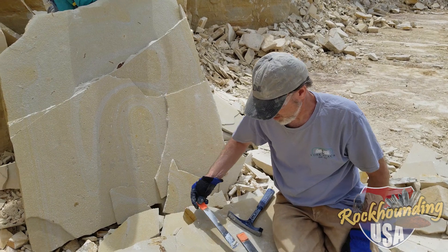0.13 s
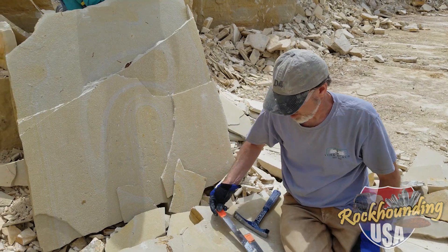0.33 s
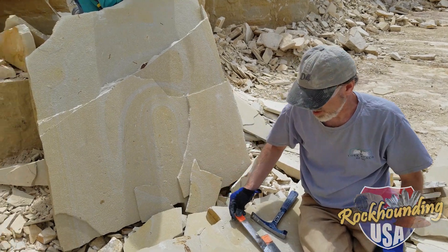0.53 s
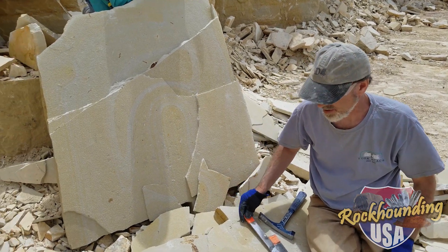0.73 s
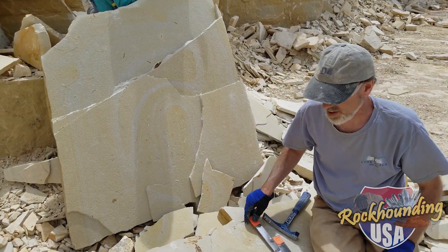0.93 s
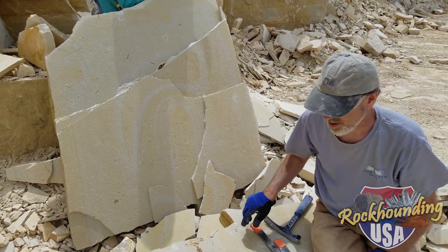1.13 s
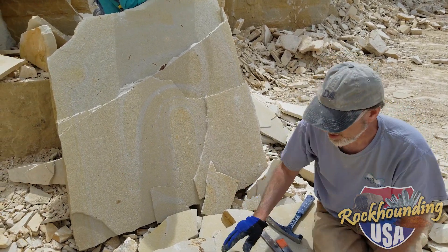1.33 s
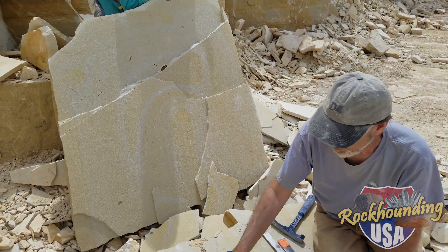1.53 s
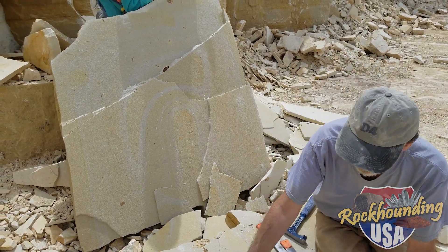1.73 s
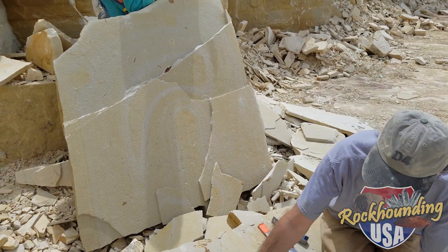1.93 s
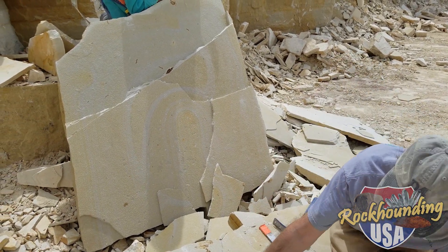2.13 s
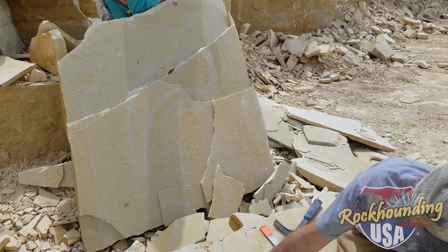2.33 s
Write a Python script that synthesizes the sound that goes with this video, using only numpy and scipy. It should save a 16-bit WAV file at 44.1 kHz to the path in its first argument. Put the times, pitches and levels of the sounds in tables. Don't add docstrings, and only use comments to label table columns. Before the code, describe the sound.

A steel blade chatters onto stone in bright clinks and drags; chips tick and a glove creaks. A second, quickly muted clatter follows, then cloth rustle and stone scuffs, in an open quarry with wind thumping close stereo microphones.

```python
import sys
import numpy as np
from scipy import signal
from scipy.fft import rfft, irfft, next_fast_len
from scipy.io import wavfile
from scipy.ndimage import uniform_filter1d, map_coordinates

SR = 44100
rng = np.random.default_rng(int(sys.argv[2]) if len(sys.argv) > 2 else 0)


def unload_audio(sound):
    columns = np.transpose(np.atleast_2d(sound))
    steps = np.round(np.clip(columns, -1, 1) * 32767)
    wavfile.write(sys.argv[1], SR, steps.astype(np.int16))


def rack_gain(trim_db):
    fader = np.asarray(trim_db, float)
    return 10 ** (fader / 20)


N = 105178

# (frequency [Hz], level [dB])
BLADE_MODES = [(3425, -0.5), (4060, 3), (5085, 8.5), (5350, 3), (5950, 3.5), (6230, 3), (7000, 4.5),
               (7170, 5.5), (8560, 7), (8870, 7), (10990, 9), (11720, -6), (12570, -11), (13700, -14.5)]
# (frequency [Hz], level [dB])
HAMMER_MODES = [(2110, 1.5), (2160, 0), (2425, -2), (2527, 4), (5060, 5), (5920, -0.5), (6265, -0.5)]


def unit(x):
    return x / np.sqrt(np.mean(x ** 2) + 1e-20)


def along(points, hz):
    f, v = np.transpose(points)
    return np.interp(np.log(hz + 1), np.log(f + 1), v, right=v[-1])


def wobble(rate):
    return map_coordinates(rng.standard_normal(1000), [np.arange(N) * min(rate, 400) / SR])


def filtered(x, response):
    m = next_fast_len(N + SR // 2)
    return irfft(rfft(x, m) * response(np.fft.rfftfreq(m, 1 / SR)), m)[..., :N]


def noise(spectrum):
    return unit(filtered(rng.standard_normal(N), lambda hz: rack_gain(along(spectrum, hz))))


def band(hz, octaves=0.59, count=1):
    def skirts(f):
        away = np.maximum(abs(np.log2((f + 1) / hz)) - octaves / 2, 0)
        return rack_gain(-24 * away / max(octaves, 0.1))
    return unit(filtered(rng.standard_normal((count, N)), skirts)).squeeze()


def peaks(table):
    def response(f):
        total = 0
        for k, (centre, width, db) in enumerate(table):
            total = total + (-1) ** k * rack_gain(db) * 1j * f * width / (centre ** 2 - f ** 2 + 1j * f * width)
        return total
    return response


def placed(x, lag_s, pan_db):
    side = np.array([[1], [-1]])
    return filtered(x, lambda hz: rack_gain(side * pan_db / 2) * np.exp(-1j * np.pi * hz * lag_s * side))


def ring(modes, t, tilt_db, chance, t60_s, damping):
    hz, db = np.transpose(modes)[..., None]
    t60 = t60_s * (hz / 5000) ** -damping
    strength_db = db + tilt_db * np.log2(hz / 5000) + 2.7 * chance[:len(modes), :1]
    sign = np.sign(chance[:len(modes), 1:])
    partials = rack_gain(strength_db - 60 * t / t60) * np.sin(2 * np.pi * hz * t) * sign
    return np.sum(partials, 0) * (1 - np.exp(-t / 0.0006))


def blade_contacts(grit):
    # (time [s], level [dB], tilt [dB per octave], hammer ring level [dB])
    contacts = [(.401, -30.5, -21, -59), (0.4069, -26, -11, -61), (.4115, -18, 0.5, -52),
                (0.4185, -23.5, -3, -57), (0.4225, -33.5, 9, -41), (0.4292, -20.5, -7.5, -44),
                (0.8892, -53.5, 16, -58), (0.933, -39.5, -3, -63), (0.9658, -26.5, -7, -37.5),
                (0.9996, -24, -9, -29.5), (1.007, -21, -17, -32), (1.014, -33.5, 5, -32.5),
                (1.017, -23, -20, -23), (1.026, -26, -6.5, -42), (1.033, -34, -18, -39),
                (1.041, -34.5, -13.5, -41.5), (1.048, -34, -1.5, -46)]
    crack_db, crack_t60_s = 4.5, 0.00081
    grit_db, grit_t60_s = 0.5, 0.048
    grip_s, grip_db = 1.058, -35
    out, t = np.zeros(N + SR), np.arange(SR // 4) / SR
    chances = rng.standard_normal((len(contacts), 28, 2))
    for (s, db, tilt, hammer_db), chance in zip(contacts, chances):
        k = round(s * SR)
        here = slice(k, k + len(t))
        burst = grit[here] * (rack_gain(crack_db - 60 * t / crack_t60_s) + rack_gain(grit_db - 60 * t / grit_t60_s))
        steel = ring(BLADE_MODES, t, tilt, chance, t60_s=0.03, damping=0.51)
        hammer = ring(HAMMER_MODES, t, 0, chance[14:], t60_s=0.093, damping=0.35)
        out[here] += rack_gain(db - 5.5) * (steel + burst) + rack_gain(hammer_db - 3.0) * hammer
    closing = np.clip((np.arange(N) / SR - grip_s) / 0.004, 0, 1)
    return out[:N] * rack_gain(0.99 * wobble(250) + grip_db * closing)


def blade_drag(grit):
    # (time [s], level [dB])
    pressure = [
        (0.439, -48.5),
        (.54, -59),
        (.76, -64),
        (.82, -57.5),
        (.96, -46),
        (1.068, -49),
        (1.2, -76),
    ]
    s, db = np.transpose(pressure)
    grains = rng.standard_normal(N) * rack_gain(4.8 * wobble(280))
    body = peaks([(hz, 300, level) for hz, level in BLADE_MODES + HAMMER_MODES[:1]])
    scrape = unit(filtered(grains, body)) + 0.77 * grit
    return rack_gain(np.interp(np.arange(N) / SR, s, db, left=-120, right=-120)) * scrape


def blade():
    grit = noise([(1300, -57.5), (2200, -4.5), (8500, -1.0), (13500, -0.5), (15000, -10)])
    return blade_contacts(grit) + blade_drag(grit)


def creak():
    # (time [s], level [dB])
    slip_times = [(0.5503, -48), (0.5545, -34), (.5605, -37), (0.5655, -48.5), (.572, -35), (0.5756, -36),
                  (0.5819, -33), (0.5866, -33), (0.5924, -29.5), (0.5955, -36), (0.6026, -32),
                  (.6079, -30.5), (.612, -34)]
    # (frequency [Hz], width [Hz], level [dB])
    glove = [(3720, 216, 12), (5720, 800, 4), (8130, 920, 5.5), (13000, 1800, -4)]
    grows_db = 13
    s, db = np.transpose(slip_times)
    slips = np.zeros(N)
    for k, scrape in enumerate(rng.standard_normal((4, len(s)))):
        slips[(s * SR).astype(int) + 5 * k] = rack_gain(db + 19.5) * (0.26 * scrape + (k == 0))
    t = np.clip(np.arange(N) / SR, s[0], s[-1])
    opening = rack_gain(grows_db * (t - s[-1]) / (s[-1] - s[0]))
    return filtered(slips * opening, peaks(glove[:1])) - filtered(slips, peaks(glove[1:]))


def chips():
    # (time [s], level [dB], pitch [Hz], bright share [dB])
    ticks = [
        (0.4898, -28, 5800, -6.5),
        (.5035, -36, 7960, 0),
        (.510, -30.5, 5760, -12),
        (0.6497, -42, 3800, 4),
        (0.666, -30, 3200, -13),
        (0.687, -34, 2940, -14),
        (0.705, -35, 3160, -13),
        (0.718, -39.5, 3120, 1.5),
    ]
    out, t = np.zeros(N + SR), np.arange(1000) / SR
    for (s, db, hz, bright_db), hiss in zip(ticks, rng.standard_normal((len(ticks), 1000))):
        pitch = rack_gain(-60 * t / 0.0076) * (1 - np.exp(-t / 0.00039)) * np.sin(2 * np.pi * hz * t)
        snap = rack_gain(bright_db - 60 * t / 0.0076) * hiss
        out[round(s * SR):][:len(t)] += rack_gain(db) * (pitch + snap)
    return out[:N]


def scuffs():
    # (time [s], level [dB], t60 [s], centre [Hz])
    scrapes = [
        (.402, -35.5, 0.085, 1840),
        (0.4112, -38.5, 0.19, 2080),
        (0.479, -41.5, 0.062, 730),
        (.999, -28, 0.087, 373),
        (2.3205, -37.5, 0.046, 7050),
        (2.3225, -50, 0.31, 4530),
        (2.32, -36.5, 0.095, 724),
        (2.353, -32.5, 0.034, 730),
        (2.376, -41, 0.088, 790),
    ]
    t, out = np.arange(N) / SR, np.zeros(N)
    for s, db, t60, hz in scrapes:
        out += (t > s) * rack_gain(db - 60 * abs(t - s) / t60 + 2.2 * wobble(300)) * band(hz)
    return out


def rock(x):
    # (frequency [Hz], t60 [s])
    decay = [(1000, 0.25), (12000, 0.016)]
    hz, t, z = signal.stft(rng.standard_normal((2, SR // 3)), SR, nperseg=256)
    fading = z * rack_gain(-60 * t / along(decay, hz)[:, None])
    tail = signal.istft(fading, SR, nperseg=256)[1]
    late = np.pad(x, (200, 0))[None]
    return signal.fftconvolve(late, tail / np.linalg.norm(tail[0]), axes=1)[:, :N]


def clothing():
    # (time [s], level [dB], length [s], centre [Hz], width [octaves])
    rustles = [(0.696, -58.5, 0.052, 3050, 0.4), (1.41, -54, 0.04, 5900, 0.62),
               (1.415, -56.5, 0.045, 13000, 0.6), (1.687, -60.5, 0.032, 7100, 0.35),
               (1.74, -50.5, 0.072, 12900, 0.6), (1.794, -59, 0.046, 1154, 0.41),
               (1.797, -48, 0.052, 5200, 0.95), (1.844, -57.5, 0.073, 2300, 1.03),
               (1.885, -56, 0.044, 675, 0.95), (1.904, -49.5, 0.087, 11400, 0.49),
               (1.878, -50.5, 0.044, 5360, 0.96), (1.97, -52.5, 0.051, 5600, 1.02),
               (2.176, -56.5, 0.22, 4930, 2.9)]
    t, out = np.arange(N) / SR, np.zeros((2, N))
    for s, db, length, hz, octaves in rustles:
        shared, *apart = band(hz, octaves, count=3)
        lagged = np.array([np.roll(shared, 7), shared]) * rack_gain([[-1], [1]])
        out += rack_gain(db - 6.95 * abs((t - s) / length) ** 1.3) * (lagged + 1.32 * np.array(apart))
    return out * rack_gain(1.06 * wobble(150) + 0.28 * wobble(25.7))


def swells(rows, spectrum, tone, drift, steep_db, shape):
    t, out, rough = np.arange(N) / SR, np.zeros(N), noise(spectrum)
    clock = np.cumsum(1 + drift * wobble(45)) / SR
    for (s, db, length, hz), turn in zip(rows, rng.random(len(rows))):
        near = slice(max(int((s - 3 * length) * SR), 0), int((s + 3 * length) * SR))
        swing = np.sin(2 * np.pi * (hz * clock[near] + turn))
        since = t[near] - s
        away = abs(since / length * np.where(since < 0, 1.4, 1))
        out[near] += rack_gain(db - steep_db * away ** shape) * (tone * swing + (1 - tone) * rough[near])
    return out


def wind():
    # (time [s], level [dB], length [s], swing [Hz])
    eddies_left = [(0.308, -26.5, 0.026, 74.4), (0.343, -20.5, 0.019, 117.3), (0.366, -24, 0.02, 99.1),
                   (0.411, -22.5, 0.03, 88.4), (0.516, -12, 0.057, 109), (0.554, -9, 0.013, 113),
                   (0.597, -21, 0.052, 94), (0.678, -17.5, 0.038, 102), (0.785, -14, 0.03, 73),
                   (0.832, -15, 0.021, 62), (0.968, -21.5, 0.019, 104.3), (1.038, -20.5, 0.0091, 118.6),
                   (1.107, -23, 0.015, 104.3), (1.199, -22.5, 0.08, 86.76), (1.249, -23, 0.05, 75.63),
                   (1.287, -23.2, 0.0098, 70.9), (1.338, -18.5, 0.0097, 73.48), (1.468, -24, 0.012, 81.5),
                   (1.58, -16, 0.057, 75.6), (1.632, -16, 0.02, 116), (2.088, -17, 0.059, 73.74),
                   (2.113, -19, 0.029, 69.9), (2.2, -20.5, 0.019, 126.3), (2.292, -30, 0.023, 129)]
    eddies_right = [(0.394, -16.5, 0.0086, 80), (0.535, -11.5, 0.0085, 91), (0.805, -16.5, 0.034, 102),
                    (0.833, -30.5, 0.04, 64), (0.91, -31, 0.029, 75), (0.997, -18, 0.082, 90),
                    (1.036, -22, 0.065, 92), (1.117, -18.5, 0.086, 87), (1.171, -13.5, 0.013, 112),
                    (1.271, -31, 0.021, 89), (1.296, -33, 0.0092, 72), (1.335, -16, 0.016, 74),
                    (1.58, -12.5, 0.017, 85), (1.627, -17.5, 0.052, 80), (1.686, -22, 0.032, 88),
                    (1.81, -29, 0.024, 90), (2.078, -15, 0.063, 75), (2.146, -25, 0.022, 98),
                    (2.173, -21.5, 0.07, 117), (2.203, -23.5, 0.013, 105), (2.228, -18, 0.033, 98),
                    (2.258, -13, 0.016, 106), (2.307, -12, 0.054, 81), (2.36, -13.6, 0.04, 104)]
    # (time [s], level [dB], length [s])
    sing_left = [(0.522, -20.5, 0.046), (0.55, -40.5, 0.013), (0.595, -30, 0.063), (0.678, -27, 0.042),
                 (1.002, -23, 0.016), (1.573, -32.5, 0.043), (2.096, -37.5, 0.12), (2.205, -26.5, 0.024),
                 (2.231, -27.4, 0.022), (2.292, -19.5, 0.032), (2.331, -20.5, 0.039), (2.357, -13.5, 0.017),
                 (2.382, -13, 0.014)]
    sing_right = [(0.506, -22, 0.068), (0.523, -37, 0.028), (0.56, -24.5, 0.073), (0.597, -16.5, 0.016),
                  (0.656, -25, 0.051), (0.804, -25, 0.016), (1.006, -29, 0.045), (1.271, -34.5, 0.033),
                  (1.578, -37.5, 0.044), (2.085, -35.5, 0.083), (2.234, -21, 0.011), (2.256, -26.5, 0.052),
                  (2.359, -22, 0.019)]
    # (frequency [Hz], level [dB])
    swirl = [(20, -8), (70, 0), (130, -10), (400, -33.5), (1500, -106)]
    # (time [s], level [dB])
    gust = [
        (0.271, -59),
        (.31, -37.5),
        (.66, -27),
        (.74, -37.5),
        (1.449, -32.5),
        (1.72, -34),
        (1.8, -62),
        (2.03, -54),
        (2.07, -32),
    ]
    cavity = [(150, 7), (350, 2.5), (700, -22.0), (1600, -45)]  # (Hz, dB)
    thump = np.array([swells(rows, swirl, tone=0.64, drift=0.1228, steep_db=23.5, shape=1.08)
                      for rows in (eddies_left, eddies_right)])
    thump = thump + 1.9 * (thump ** 2 - uniform_filter1d(thump ** 2, size=2000))
    thump = filtered(thump, lambda hz: 1 / (1 + (hz / 370) ** 4))
    turbulence = np.array([rack_gain(4.9 * wobble(22)) * noise(swirl) for port in "LR"])
    bed = rack_gain(np.interp(np.arange(N) / SR, *np.transpose(gust))) * turbulence
    sing = np.array([swells([(*row, 355) for row in rows], cavity, tone=0.3, drift=0.1, steep_db=16, shape=1.38)
                     for rows in (sing_left, sing_right)])
    return rack_gain(10.0) * thump + rack_gain(2.0) * bed + rack_gain(2.5) * sing


def engine():
    # (multiple of the cycle [1], level [dB])
    harmonics = [(2, 0), (3, -11), (5, -12), (7, -19), (11, -8), (12, -11)]
    cycle_hz, level_db = 28.4, -45
    phase = 2 * np.pi * cycle_hz * np.cumsum(1 + 0.00892 * wobble(5.01)) / SR
    lines = 0
    for k, db in harmonics:
        start = 6 * rng.random((2, 1)) ** 2
        lines = lines + rack_gain(db + 6.4 * wobble(7.44)) * np.sin(k * phase + start)
    return rack_gain(level_db) * lines


def quarry():
    # (frequency [Hz], level [dB])
    rumble = [(45, 0.5), (110, -9.5), (230, -14), (340, -13.5), (480, -16), (720, -42.5), (3000, -102)]
    # (frequency [Hz], level [dB])
    hiss = [(500, -0.5), (2500, -6.5), (6000, -16), (8800, -24), (11300, -4.5), (16000, -4)]
    shared, apart = noise(rumble), np.array([noise(rumble), noise(rumble)])
    far = rack_gain(1.85 * wobble(9.4)) * (0.74 * shared + 0.48 * apart)
    return rack_gain(-45) * far + rack_gain(-58.5) * np.array([noise(hiss), noise(hiss)])


def scene():
    steel, small = blade(), creak() + chips() + scuffs()
    moved = np.arange(N) > 0.7 * SR
    near = placed(steel * ~moved, lag_s=0.00009, pan_db=-3.1)
    near = near + placed(steel * moved, lag_s=0.000118, pan_db=-3.5)
    near = near + placed(small, lag_s=0.00005, pan_db=0.54)
    walls = rack_gain(-13) * rock(steel + small)
    return near + walls + clothing() + wind() + engine() + quarry()


def band_limit(x):
    return signal.sosfilt(signal.butter(12, 16620, fs=SR, output="sos"), x)


def record(dry):
    # (frequency [Hz], level [dB])
    port = [(8200, 1.5), (9900, -5.5), (11200, -3), (15600, 0.5), (16500, -20)]
    ceiling = 0.5
    x = filtered(dry, lambda hz: hz / (hz + 15) * rack_gain(along(port, hz)))
    x = x / (1 + abs(x / ceiling) ** 6) ** (1 / 6)
    return band_limit(x)


dry = scene()
out = record(dry)
unload_audio(out)
```